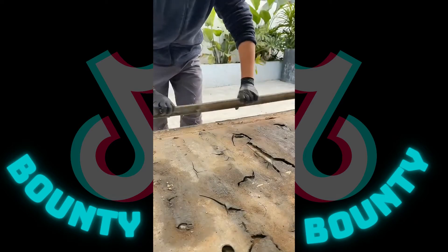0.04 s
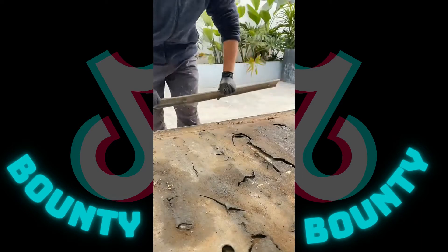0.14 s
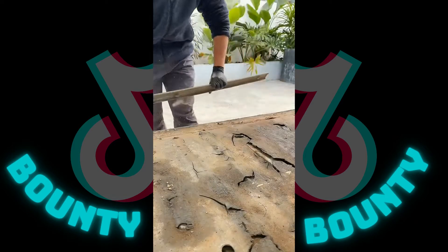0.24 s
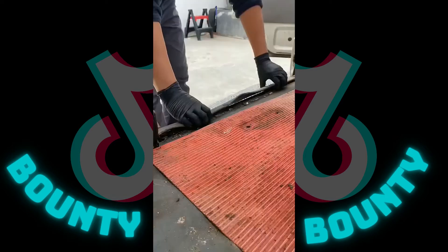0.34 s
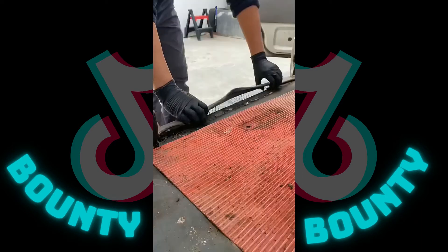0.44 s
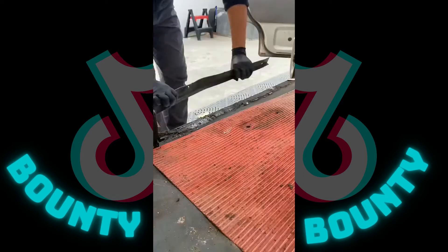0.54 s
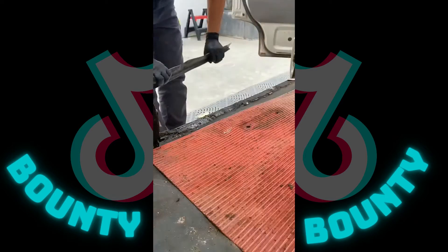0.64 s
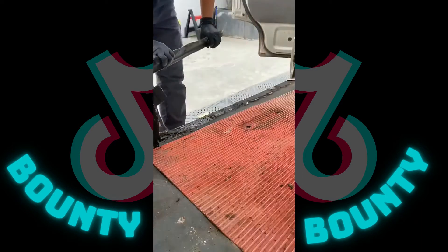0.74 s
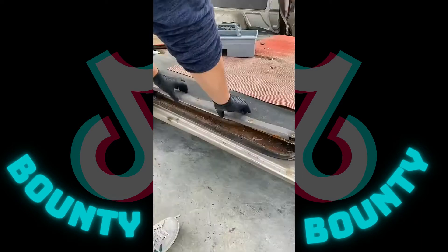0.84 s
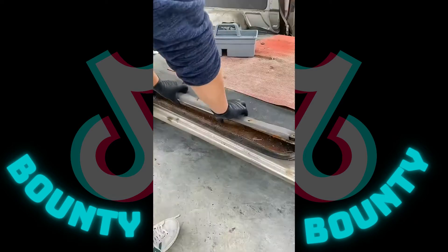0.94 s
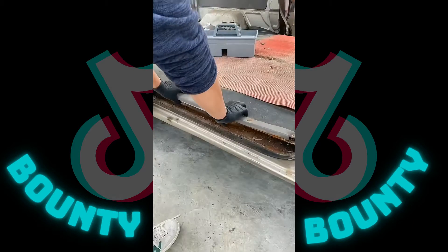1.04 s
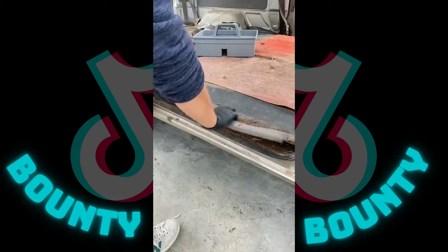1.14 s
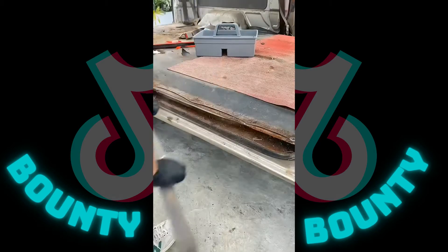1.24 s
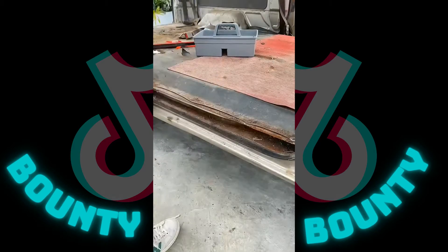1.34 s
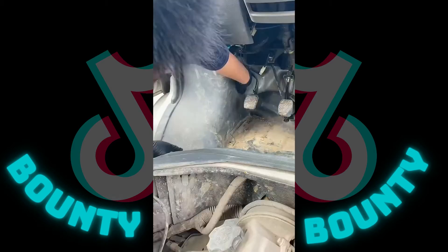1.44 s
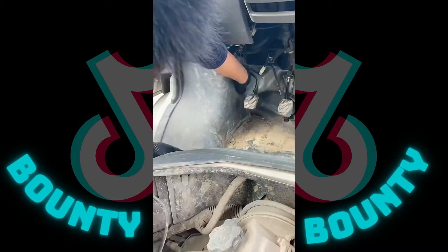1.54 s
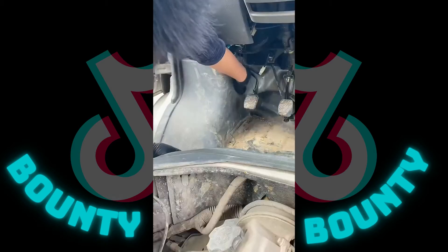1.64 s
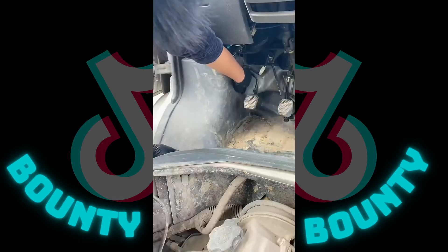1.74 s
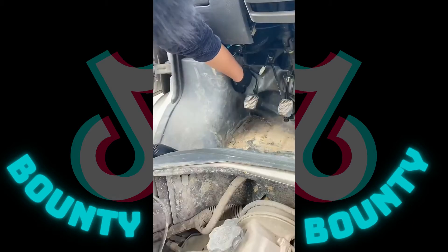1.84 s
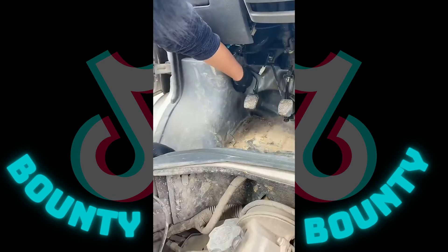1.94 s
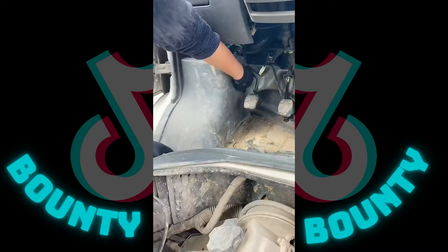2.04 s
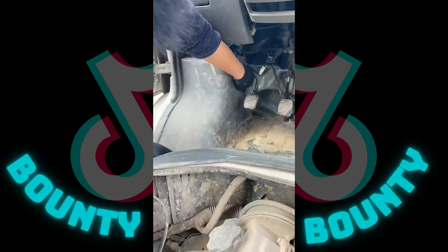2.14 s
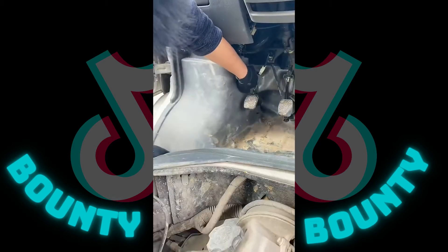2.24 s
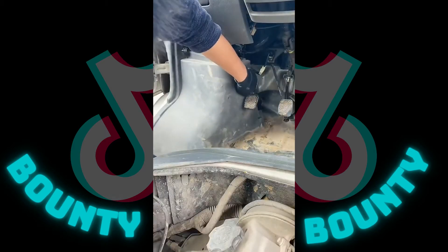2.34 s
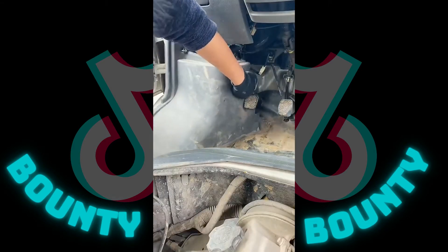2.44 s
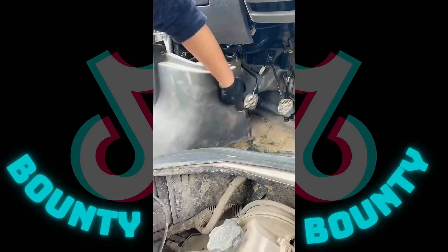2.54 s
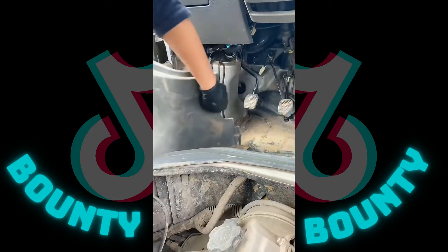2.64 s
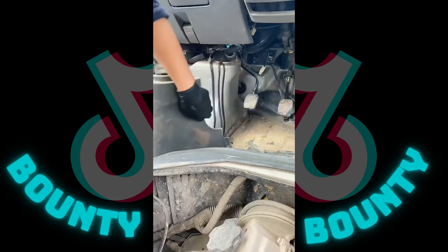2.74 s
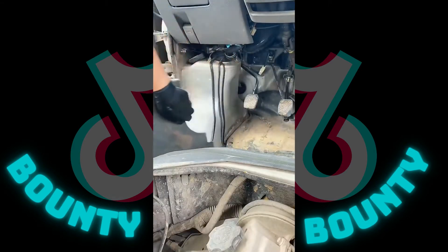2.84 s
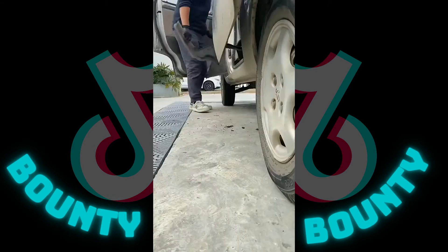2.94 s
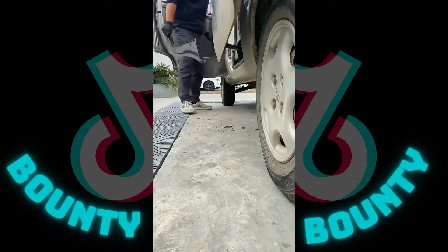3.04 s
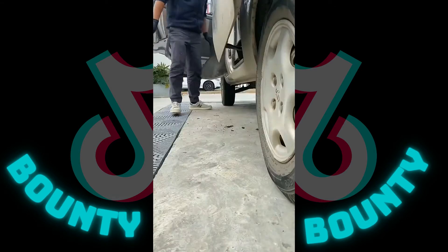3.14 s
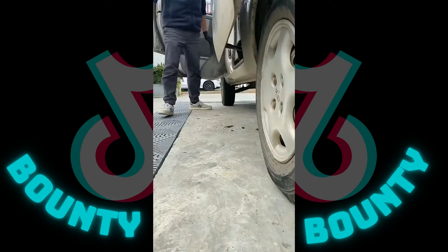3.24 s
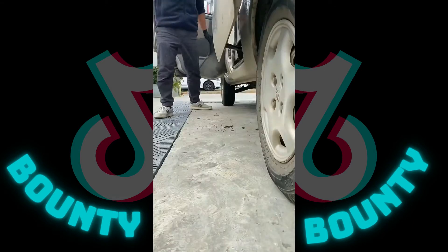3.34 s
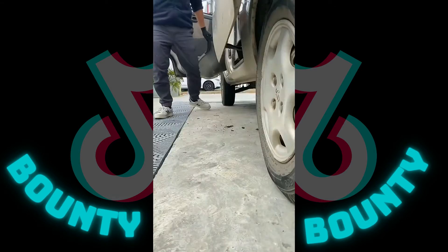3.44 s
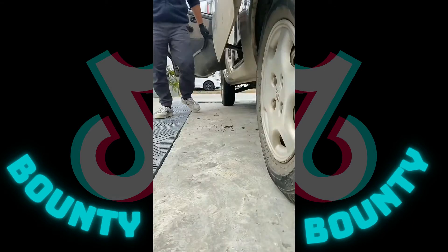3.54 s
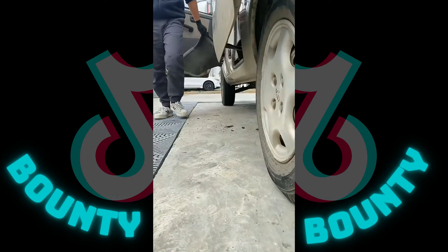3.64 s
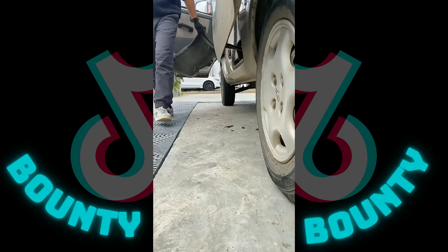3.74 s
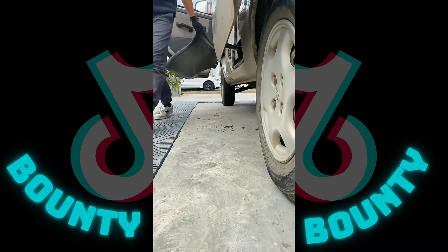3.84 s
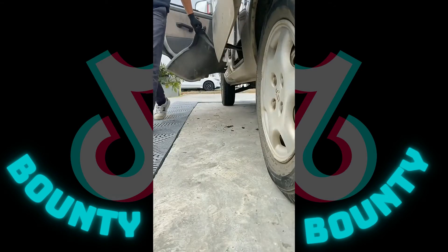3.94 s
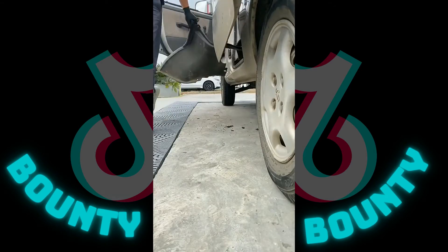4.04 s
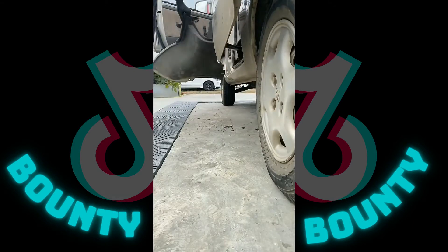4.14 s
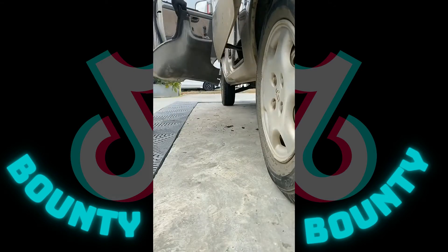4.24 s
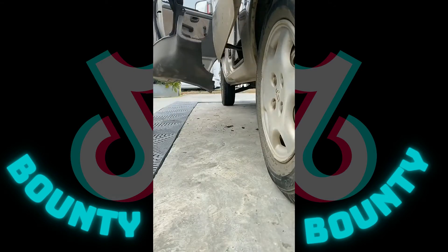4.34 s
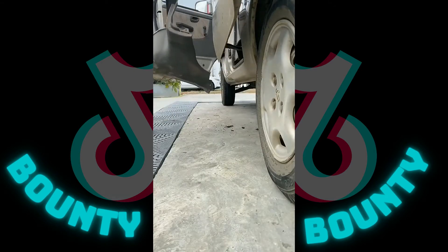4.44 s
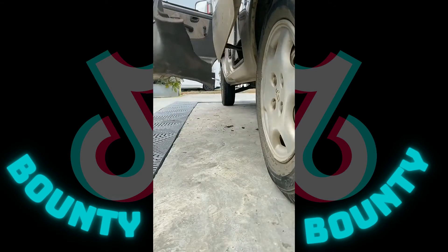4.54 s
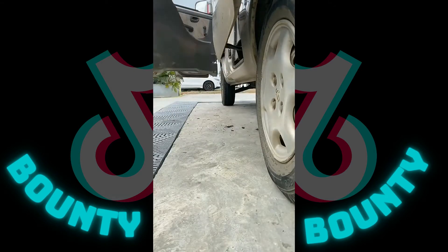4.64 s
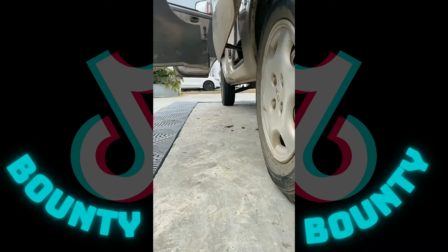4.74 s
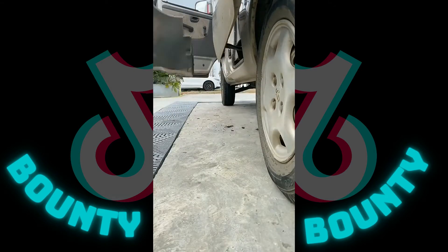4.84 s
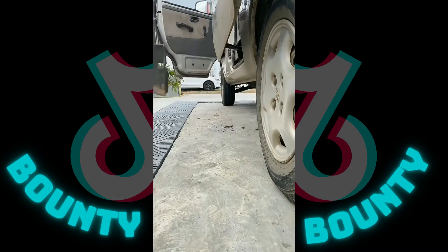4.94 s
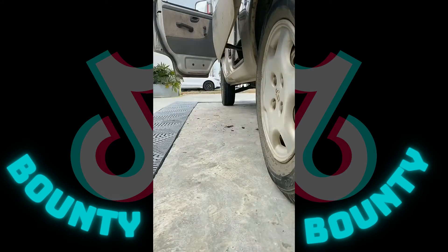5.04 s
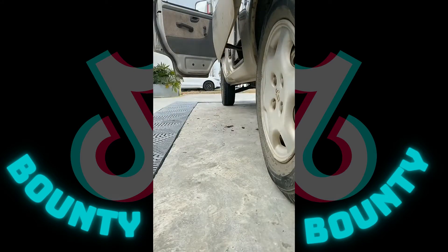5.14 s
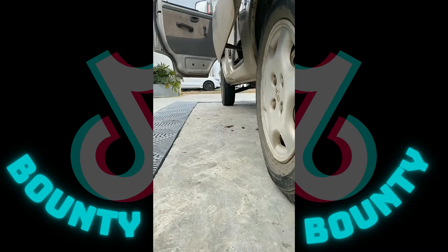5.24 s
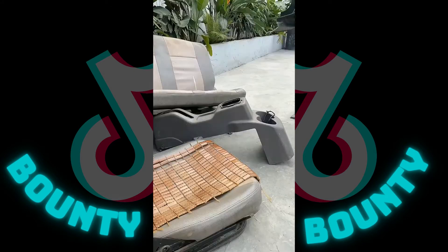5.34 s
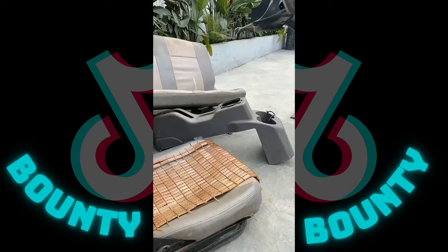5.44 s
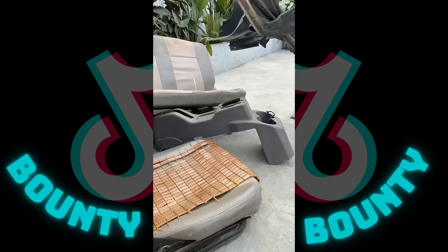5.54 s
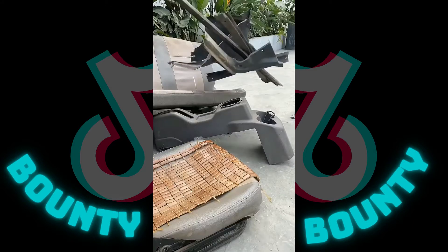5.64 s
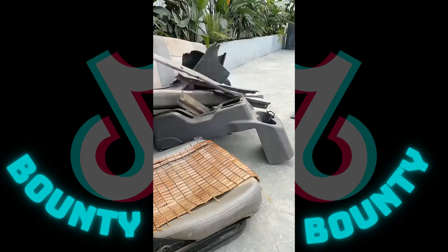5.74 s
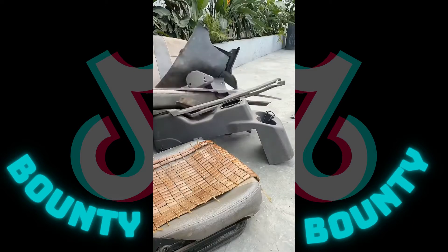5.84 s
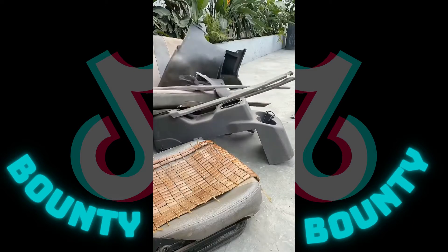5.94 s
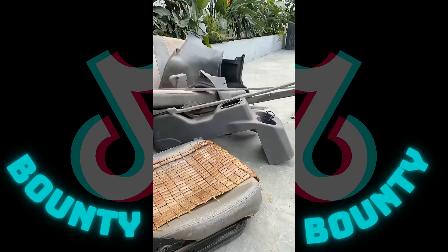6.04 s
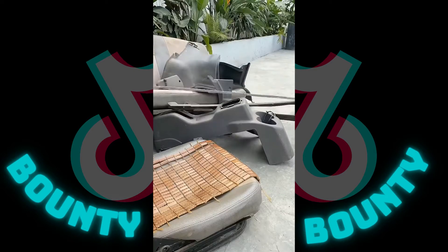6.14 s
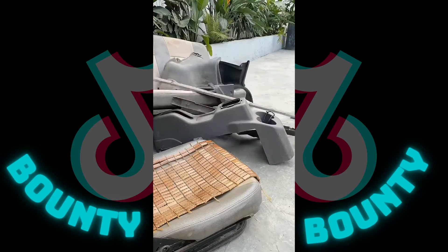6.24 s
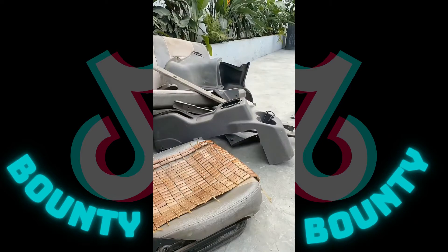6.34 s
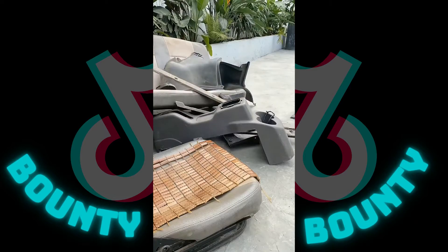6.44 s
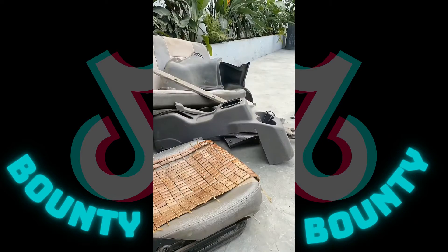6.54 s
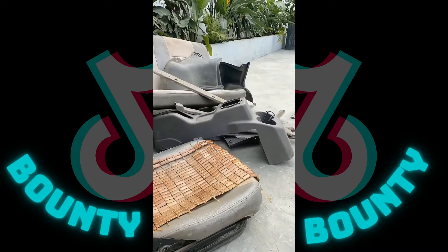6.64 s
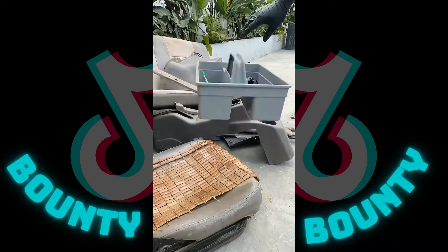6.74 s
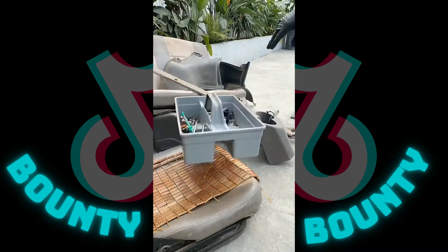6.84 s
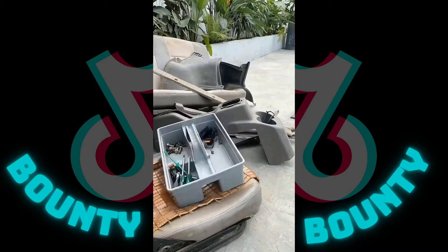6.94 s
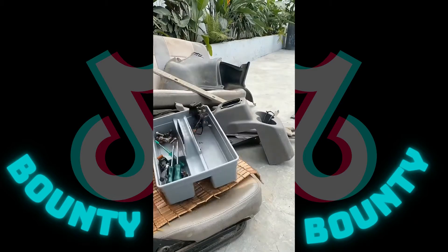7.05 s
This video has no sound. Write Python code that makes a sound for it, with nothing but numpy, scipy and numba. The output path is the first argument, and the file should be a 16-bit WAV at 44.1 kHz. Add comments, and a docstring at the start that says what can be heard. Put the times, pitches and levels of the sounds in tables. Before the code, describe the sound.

A vehicle interior comes apart in short, hard-cut bursts. First come sharp plastic knocks and gritty prying, then a soft handling lull that builds into rough rubber dragging and thumps. Steps and faint heel tocks sound further off on concrete. Finally brittle plastic pieces crash and tumble close by, followed by a tray of tools clacking down. Outdoors, dry, phone microphone, steady low yard rumble.

```python
"""Blows and scraping as a van is stripped, in quick shots heard by a phone: trim strips prised off a sill,
a rubber mat dragged out of the footwell, footsteps on concrete, plastic parts and a tool tray dropped on a pile.
Damped partials, rattle and stick-slip grit ring the object of each shot, and each cut chops the blows.
Swelling notes, dry snaps, mat rasps and heel tocks join them over the steady rumble and hiss of the yard."""
import sys
import numpy as np
from scipy import signal
from scipy.fft import rfft, irfft, next_fast_len
from scipy.io import wavfile
from numba import njit

SR = 44100
rng = np.random.default_rng(int(sys.argv[2]) if len(sys.argv) > 2 else 0)


def unload_audio(sound):
    """Save the sound as a 16-bit wav file, at the path given as the first command line argument."""
    columns = np.transpose(np.atleast_2d(sound))
    # keep every value between -1 and 1, then stretch to whole-number steps
    steps = np.round(np.clip(columns, -1, 1) * 32767)
    wavfile.write(sys.argv[1], SR, steps.astype(np.int16))


N = 313551

# Thud, body, clack, edge and air. Each row: low edge in Hz, high edge in Hz, decay as a factor, share of side
# sound, rattle in dB against the ring, slips a second, cycles that a slip rings, scatter of slips in dB,
# smooth hiss in dB under the slips.
BANDS = [(54, 210, 4.73, .012, -3, 27, 9.8, 1.5, -2), (250, 1073, 1.61, 0.54, -2, 220, 26, 4.5, -1.5),
         (1200, 4000, 0.97, 0.5, -5, 600, 19.3, 1.5, -1.5), (4250, 7790, 0.66, 0.5, 4, 750, 69, 2, -2.5),
         (11990, 14000, 0.46, 0.34, 1, 1200, 110, 9.5, 0)]
# Resonances of what is handled. Each row: pitch in Hz, width in Hz, level in dB before the shared ring level.
TRIM = [(400, 74, -5), (1070, 14, -13.5), (2180, 300, -8.5), (2970, 1000, -6)]
MAT = [(185.6, 53, -7.5), (498, 13, 0.5), (2010, 140, -3), (2520, 830, -8.5), (6080, 1200, 1)]
GROUND = [(75, 18, -0.5), (135, 42, -6.5), (294, 31, 0.5), (385, 35, -1), (452, 390, -1), (522, 11, -7),
          (2620, 370, -6.5)]
PILE = [(410, 87, -18), (754, 85, -9), (880, 73, -8), (2870, 810, -13), (5500, 1200, -10)]
# The shots. Each row: start in seconds, resonances of the object that rings.
SHOTS = [(0, TRIM), (0.248, TRIM), (0.85, TRIM), (1.387, MAT), (2.836, GROUND), (5.62, PILE), (5.885, PILE),
         (6.688, PILE)]
# Air band of each shot, one value a shot: level in dB against the usual.
SHOT_AIR_DB = [1.5, 3, 1, 5, -3, 0.5, 0.5, 2]

CUTS = np.array([s for s, _ in SHOTS] + [N / SR])  # shot starts and the end, in seconds
PAIR = np.array([[1], [-1]])  # left and right
STEP = 8  # levels are worked out every eighth sample
WIDE_HZ = 550.  # below this the sound narrows to the middle
HEEL_PAN_DB = 6.5  # left minus right


def undb(db):
    """Gain of a level in dB."""
    return 10 ** (np.asarray(db) / 20)


def band(x, lo_hz, hi_hz, order=3):
    """Band-pass of white noise, scaled to rms near 1."""
    sos = signal.butter(order, [lo_hz, hi_hz], "bandpass", fs=SR, output="sos")
    return signal.sosfilt(sos, x) / np.sqrt((hi_hz - lo_hz) / (SR / 2))


def spread(mid, side, share):
    """Left and right from a shared and an opposed part."""
    return mid + np.clip(share, 0, 1) * side * PAIR


def side_lean(hz, place, width):
    """Left and right gains of partials at random places, narrowing towards the bass."""
    return 1 + width * np.minimum(hz / WIDE_HZ, 1) * (place - .5) * PAIR


@njit
def add(out, start, stop, first, a, b, left, right):
    """Two-pole resonators that ring freely, each between its own two samples."""
    for k in range(len(a)):
        old, y = 0., first[k]
        for i in range(start[k], stop[k]):
            out[0, i] += left[k] * y
            out[1, i] += right[k] * y
            old, y = y, a[k] * y - b[k] * old


def add_rings(out, s, end_s, hz, t60, gain):
    """Damped sines from times, pitches and decays; each stops about 40 dB down or at end_s."""
    start = (s * SR).astype(int)
    stop = np.minimum(start + (.65 * t60 * SR).astype(int), int(end_s * SR))
    turn = 2 * np.pi * hz / SR
    fall = 1e-3 ** (1 / (t60 * SR))
    add(out, start, stop, np.sin(turn), 2 * fall * np.cos(turn), fall ** 2, gain[0], gain[1])


def yard():
    """Steady rumble and hiss of the open yard, from shaped noise whose bass is alike left and right."""
    # Spectrum of the yard. Each row: frequency in Hz, relative density in dB per Hz.
    yard_shape = np.array([(15, -41), (25, -2.5), (55, 10), (111, -8.5), (439, -30.5), (818, -17.5),
                           (1100, -34.5), (6210, -33), (9070, -91), (13600, -39), (16000, -66)])
    size = next_fast_len(N)
    hz = np.maximum(np.arange(size // 2 + 1) * SR / size, 1)
    shape = undb(np.interp(np.log(hz), np.log(yard_shape[:, 0]), yard_shape[:, 1]))
    mid, side = rfft(rng.standard_normal((2, size))) * shape
    out = irfft(spread(mid, side, hz / 9000.), size)[:, :N]
    return out * undb(-59) / np.sqrt(np.mean(out ** 2))


def rubbing():
    """Gain of rumble, scraping and slides in each band; brightness tips the bands round the clack."""
    # Low rumble of handling and steps. Each row: time in seconds, relative level in dB.
    rumble = [(0.0, -43), (0.24, -47), (0.53, -53), (0.95, -47.5), (1.21, -42.5), (1.52, -48), (2.14, -46),
              (2.26, -38), (2.49, -42), (2.79, -58.5), (3.8, -52), (4.16, -57), (4.53, -56.5), (5.48, -56),
              (6.22, -37), (6.38, -57), (6.61, -46), (7.11, -66)]
    # Scraping and rattling between knocks, one curve a stretch of work. Each row: time in seconds,
    # relative level in dB, brightness in dB a band.
    scrape = [
        [(0.0, -52.5, 12), (0.412, -65.5, -17), (0.564, -35, -2), (0.644, -55, -13), (0.834, -40.5, -3),
         (1.062, -57.5, -3), (1.21, -52.5, 13), (1.344, -37, -1), (1.388, -55, 3)],
        [(1.388, -53.5, 2.5), (1.57, -44.5, -1), (2.106, -48, -4), (2.236, -26.5, -8), (2.306, -36, -7.5),
         (2.544, -28.5, -2.5), (2.662, -29, -4), (2.75, -62, -8), (2.84, -56.5, -11)],
        [(2.84, -75.5, -5), (2.96, -62, -6.5), (3.01, -51.5, 7), (3.154, -57, -1), (3.45, -63, 3),
         (3.566, -62.5, 3), (3.948, -48, 1), (4.154, -67, 1), (4.2, -51, 3)],
        [(4.2, -64, 2), (4.558, -64.5, -5), (4.816, -66.5, -4.5), (5.014, -65, -10.5), (5.278, -58, 4),
         (5.62, -61.5, 2.5)],
        [(5.62, -55, -3), (5.69, -27, 5), (5.81, -25.5, -1), (5.836, -37, 2.5), (6.018, -43.5, -6),
         (6.172, -24.5, 2), (6.244, -31, -1.5), (6.52, -38, -0.5), (6.622, -42, -5), (6.689, -54, 2)],
        [(6.689, -55.5, -7.5), (6.885, -59, -24), (7.035, -39.5, -4), (7.11, -16.5, -9.5)],
    ]
    # Single slides and scuffs. Each row: start in seconds, moment the swell aims for in seconds, latest end
    # in seconds (a cut may come sooner), relative level in dB, brightness in dB a band.
    slides = [(0.31, 0.389, 0.44, -38.5, -1), (0.554, 0.565, 0.65, -23, 1.5),
              (0.98, 1.077, 1.235, -22, -2.5), (1.21, 1.263, 1.3, -27.5, -3),
              (1.91, 1.987, 2.02, -52.5, 15.5), (2.036, 2.054, 5.6, -30, -2), (2.07, 2.167, 2.3, -26, -0.5),
              (4.286, 4.423, 4.84, -48.5, 4.5), (4.853, 4.934, 5, -45, 18.5), (4.94, 4.986, 5.7, -62, 2),
              (6.242, 6.335, 6.27, -29, 18), (6.81, 6.847, 7.4, -42, 10), (7.054, 7.061, 7.9, -24, 6)]
    # Body, clack, edge and air at brightness 0, each in dB against the level of the scrape.
    colour = np.array([-7.5, -8.5, -18, -30])[:, None]
    # How far brightness moves body, clack, edge and air, each as a factor.
    tip = np.array([-0.75, 0.26, 1.09, 1.61])[:, None]
    swell_db = 34  # how far below its aim a slide starts, and the fall it heads for afterwards

    t = np.arange(N // STEP + 1) * STEP / SR
    db = np.zeros((len(BANDS), len(t)))
    db[0] = np.interp(t, *np.transpose(rumble))
    for curve in scrape:
        s, level, bright = np.transpose(curve)
        now = t >= s[0]
        db[1:, now] = np.interp(t[now], s, level) + colour + tip * np.interp(t[now], s, bright)
    power = undb(db) ** 2
    for start, aim, end, level, bright in slides:
        next_cut = CUTS[CUTS > aim][0]
        now = (t > start) & (t < min(end, next_cut))
        swell = np.interp(t[now], [start, aim, end], [-swell_db, 0, -swell_db])
        power[1:, now] += undb(level + swell + colour + tip * bright) ** 2
    shot = np.searchsorted(CUTS[1:-1], t)
    power[-1] *= undb(np.array(SHOT_AIR_DB)[shot]) ** 2
    return np.sqrt(power)


def slips(k, noise):
    """Dense small stick-slips in band k, each ringing briefly at its own pitch, over a smooth hiss."""
    lo, hi, _, share, _, rate, cycles, scatter_db, hiss_db = BANDS[k]
    when, u, size, place, pick = rng.random((8000, 5))[:int(rate * N / SR)].T

    # in body and clack, half of the slips follow a wandering pitch with 14 new goals a second
    goals = rng.random(int(14 * N / SR))
    favoured = np.interp(when, np.linspace(0, 1, len(goals)), goals) + .15 * (u - .5)
    follows = pick < .5 * (k in (1, 2))
    u = np.where(follows, np.clip(favoured, 0, 1), u)
    hz = lo * (hi / lo) ** u

    gain = undb(scatter_db * np.minimum(-np.log(1 - size), 3.2)) * side_lean(hz, place, share * 3.5)
    out = np.zeros((2, N))
    add_rings(out, when * N / SR, N / SR, hz, cycles / hz, gain)
    side_lo = max(lo, min(WIDE_HZ, hi / 2))
    hiss = spread(band(noise[0], lo, hi), band(noise[1], side_lo, hi), share)
    return out / np.sqrt(np.mean(out ** 2)) + undb(hiss_db) * hiss


def notes():
    """Clear notes, low and middle hums and one thin high tone: wavering sines that swell, then fade or are cut."""
    # Each row: start in seconds, pitch in Hz, level in dB before swell and decay, rise in ms, decay in seconds.
    note_rows = [(0.0, 153.5, -24.5, 0.69, 0.28), (0.015, 70.1, -23.5, 5.7, 0.49),
                 (0.401, 379, -25.5, 5.6, 0.14), (0.419, 64.6, -17.5, 17, 0.2),
                 (0.564, 374, -37, 5.4, 0.061), (0.575, 790, -28, 6.7, 0.23), (1.02, 410, -26, 28, 0.57),
                 (1.082, 337, -1.5, 3.8, 0.054), (1.1, 536, -17.5, 6.2, 0.13), (1.13, 333, -27.5, 7, 0.32),
                 (1.11, 168.6, -24.5, 19, 0.35), (1.245, 410, -21.5, 11, 0.24),
                 (1.249, 1180, -21, 7.4, 0.17), (2.063, 197, -21, 8.1, 0.13), (2.12, 505, -13.5, 8.2, 0.16),
                 (2.155, 230, -20.5, 6.7, 0.14), (2.225, 506, -14, 9.6, 0.13),
                 (2.554, 422, -16.5, 4.8, 0.096), (2.989, 74.8, -24, 25, 0.42), (3.095, 525, -35, 5, 0.21),
                 (3.34, 384, -39, 12, 0.17), (3.485, 70, -22.5, 7.1, 0.34),
                 (3.487, 131.5, -18.5, 9.9, 0.16), (3.488, 396, -20, 3.1, 0.15),
                 (3.495, 538, -20, 2.1, 0.16), (3.749, 61.7, -24.5, 14, 0.2), (3.875, 98, -20.5, 9.2, 0.18),
                 (3.885, 263.8, -20, 12, 0.25), (3.895, 76.3, -24, 19, 0.3), (3.899, 180, -25, 4.2, 0.22),
                 (5.077, 888, -50, 1, 0.034), (5.665, 882, -14.5, 3, 0.083), (6.283, 880, -38, 4.1, 0.043),
                 (6.314, 970, -7.5, 0.91, 0.043), (6.856, 719, -5, 1.8, 0.042),
                 (6.885, 439, -14.5, 4.9, 0.079), (6.978, 11200, -20.5, 6.8, 0.083),
                 (7.068, 753, -12, 4.2, 0.13)]
    wobble = 0.0091  # share by which the pitch strays, less above 1 kHz
    out = np.zeros(N)
    for (s, hz, db, rise_ms, t60), u in zip(note_rows, rng.random(len(note_rows))):
        a = int(max(s, 0) * SR)
        next_cut = CUTS[CUTS > s + 1e-4][0]
        t = np.arange(int(min(next_cut - s, t60) * SR) - 1) / SR
        phase = 2 * np.pi * (hz * t + wobble * min(hz, 1000) / 30 * np.sin(30 * t + 6 * u))
        swell = (1 - np.exp(-t * 1000 / max(rise_ms, .3))) ** 2
        out[a:a + len(t)] += undb(db) * swell * 0.00067 ** (t / t60) * np.sin(phase)
    return out


def partial_pitches(k, shot, u, body_hz, clack_hz):
    """Pitches of a blow's partials in band k: low modes, a cluster round one pitch, or a free scatter."""
    # Low modes of the van body, the base of every thud: pitches in Hz before the shot's factor.
    boom_hz = [70.5, 149, 223.5]
    # Thud pitch of each shot as a factor; loose parts on the pile thud higher than the van.
    boom_pitch = [1.1, 0.92, 1.1, 1, 1, 1.7, 1.5, 1.2]
    lo, hi = BANDS[k][:2]
    hz = lo * (hi / lo) ** u
    if k == 0:
        hz = np.array(boom_hz) * boom_pitch[shot] * (1 + .12 * (u - .5))
    if k == 1:  # a hollow part gathers its partials round one pitch
        hz = body_hz * 2 ** (1.5 * (u - .5) * np.linspace(.1, 1, len(u)))
    if k == 2:
        hz[::2] = clack_hz * 2 ** (.5 * (u[::2] - .5))
    return hz


def add_chatter(out, s, cut, centre_hz, t60, gain, share, chance):
    """A struck part chatters on near its pitch in short ticks, thinning and fading with its decay."""
    late, u, size, place = chance
    after = .6 * t60 * late ** 1.5
    hz = centre_hz * 2 ** (0.98 * (u - .5))
    fade = undb(-3 - 60 * after / (1.69 * t60))
    each = gain * fade * size * (1 + share * (place - .5) * PAIR)
    add_rings(out, np.minimum(s + after, cut), cut, hz, 20.7 / hz, each)  # a tick rings 20.7 cycles


def knocks(k, count):
    """Band k of all blows: struck partials, and the power over time of the rattle and crack."""
    # Blows on the handled parts. Each row: start in seconds, relative clack level in dB, then thud, body and
    # edge in dB above it, body pitch in Hz, clack pitch in Hz, decay in seconds before the factors of band and shot.
    knock_rows = [(0.0014, -43, 11.5, 6, -13, 250, 1200, 0.12), (0.0442, -36, 4, -27, -7, 380, 3330, 0.069),
                  (0.0646, -34.5, -19, -33, -3, 258, 3310, 0.12),
                  (0.397, -16.5, -6, -9.5, -4.5, 394, 1360, 0.083),
                  (0.4105, -14, -9.5, -6.5, -7.5, 752, 2010, 0.081),
                  (0.4516, -24.5, -1, 1.5, -14, 298, 3250, 0.08), (0.472, -27, 6, 1, -14, 294, 1400, 0.092),
                  (0.5012, -23.5, -13, -9, -21, 294, 1683, 0.22),
                  (0.561, -17.5, -25, -27, -15, 890, 2880, 0.06),
                  (0.5695, -13, -15.5, -9.5, -23, 362, 1470, 0.13),
                  (0.7295, -34.5, -5, -5, -44, 757, 2540, 0.16),
                  (0.7705, -45.5, -10, 13.5, -30, 558, 1200, 0.12),
                  (0.8334, -38, -26, 11.5, -14, 612, 1320, 0.22),
                  (1.0021, -46, 4, 8.5, -2, 461, 2940, 0.81),
                  (1.0863, -9.5, -19.5, 1, -10.5, 790, 1305, 0.11),
                  (1.112, -13.5, -36, -2, -9.5, 840, 1290, 0.061),
                  (1.2406, -18.5, -10, -2, -19.5, 1183, 1560, 0.22),
                  (1.286, -10, -29, -17.5, -8.5, 392, 3320, 0.053),
                  (1.5733, -39.5, -8, -5, -18, 453, 1420, 0.061),
                  (1.6783, -36, -1, 3.5, -10.5, 654, 3220, 0.086),
                  (1.8113, -46.5, 10, 15, -27, 703, 1440, 0.077),
                  (1.8496, -24, -10.5, 1.5, -26, 724, 1300, 0.11),
                  (2.0558, -15.5, -14, -3, -22, 594, 1600, 0.12),
                  (2.1264, -29, -9, 7, -16, 536, 1170, 0.35),
                  (2.2968, -35.5, -5.5, -10, 12.5, 522, 2160, 0.05),
                  (2.3272, -18, -25.5, -6.5, -15, 470, 1840, 0.17),
                  (2.3796, -15.5, -16, -1, -26, 689, 2270, 0.15),
                  (2.392, -18.5, -20, -4.5, -20.5, 521, 1883, 0.28),
                  (2.5536, -33.5, 0, 0, -13, 437, 2010, 0.096),
                  (2.6435, -19, -19, -7, -24.5, 1070, 1455, 0.17),
                  (2.681, -26, -23, -9.5, -17.5, 900, 2570, 0.1),
                  (2.9686, -28.5, -3, -2.5, -19.5, 464, 1425, 0.21),
                  (3.0981, -38.5, 4, -1, -17, 531, 1260, 0.12),
                  (3.2304, -33, -27, -11.5, -9, 250, 2010, 0.13),
                  (3.323, -51, -7, -2.5, -10, 250, 2750, 0.24),
                  (3.483, -17.5, -17.5, -6, -20.5, 904, 2944, 0.13),
                  (3.823, -35.5, -11, -2, -9, 362, 1410, 0.04),
                  (3.8464, -36.5, -15, -3, -6, 264, 2700, 0.082), (3.873, -31, 0, 2, -13, 526, 1310, 0.15),
                  (5.3111, -33, -25, -15, -18.5, 566, 1350, 0.13),
                  (5.3577, -35, -31, -10, -17, 508, 2486, 0.18),
                  (5.5182, -38.5, -12, -8, -15, 656, 1410, 0.074),
                  (5.638, -17, -23, -2, -17, 901, 1410, 0.15),
                  (5.654, -5.5, -18, -15, -17, 392, 2685, 0.13),
                  (5.6659, -10, -14.5, -5, -18, 860, 2960, 0.1),
                  (5.6965, -10, -12, -11.5, -19.5, 802, 2870, 0.14),
                  (5.719, -14, -19, -3.5, -24, 656, 2890, 0.065),
                  (5.7413, -17, -35, -2.5, -6.5, 536, 1220, 0.13),
                  (5.7625, -13, -28, -11, -19.5, 792, 1320, 0.14),
                  (5.8702, -21.5, -31, -8.5, -19, 452, 2620, 0.083),
                  (5.915, -25.5, -20, -3, -20, 497, 2650, 0.61),
                  (5.9925, -16.5, 2, -2.5, -15.5, 250, 3000, 0.047),
                  (6.0546, -22.5, -21, -16, -7, 680, 2180, 0.052),
                  (6.0789, -19, -28, -7.5, -5, 344, 2400, 0.062),
                  (6.1005, -18.5, -22, -6, -29, 900, 1580, 0.05),
                  (6.1198, -6.5, -20.5, -11.5, -35, 400, 2870, 0.1),
                  (6.155, -8.5, -16, -14, -7.5, 1160, 1660, 0.044),
                  (6.1759, -16, -16, -14, -22, 1007, 2750, 0.15),
                  (6.186, -22.5, -3, 4.5, -20, 592, 1390, 0.055),
                  (6.2417, -18.5, -11, -18, -38, 398, 1720, 0.19),
                  (6.267, -17, -27, -22, -33, 880, 2270, 0.091),
                  (6.2825, -11, -17, -8, -24, 982, 2100, 0.18),
                  (6.3155, -13.5, -12.5, -9.5, -18, 955, 2050, 0.2),
                  (6.338, -14.5, -34, -11, -12.5, 890, 3100, 0.055),
                  (6.3684, -18.5, -40, -21, -22, 880, 3646, 0.21),
                  (6.4172, -22.5, -41, -28, -14, 1260, 1960, 0.13),
                  (6.4702, -25.5, -25, -11, -14.5, 970, 1446, 0.17),
                  (6.513, -32.5, -5, 1.5, -33, 398, 1390, 0.12),
                  (6.552, -33.5, -12.5, 0, -15, 400, 1980, 0.064),
                  (6.5802, -28.5, -10, -16, -20, 384, 1740, 0.073),
                  (6.6243, -19, -25, -8, -15, 982, 1610, 0.11),
                  (6.7333, -41, -3, 4.5, -32, 273, 1390, 0.058),
                  (6.8009, -43.5, -11, 7, -33, 452, 1400, 0.08),
                  (6.8465, -23.5, -26, -12, -7, 730, 3370, 0.088),
                  (6.8543, -6.5, -13, -7, -9.5, 737, 1213, 0.12),
                  (6.8808, -6, -25, -3, -20, 384, 1260, 0.063),
                  (6.893, -18, -20, 2.5, -14, 500, 1900, 0.06),
                  (6.915, -28.5, -18, -2, -23, 960, 1280, 0.17),
                  (6.9804, -30, -22, -7, -9.5, 630, 1920, 0.082),
                  (7.0281, -29, -14, -7, -15, 920, 1940, 0.16),
                  (7.049, -25.5, -18, -1, -29, 835, 1400, 0.065),
                  (7.0651, -11, -32, -2.5, -16, 722, 1408, 0.26),
                  (7.0873, -11, -36, -7, -13, 720, 1200, 0.44)]
    # Heel taps on concrete. Each row: start in seconds, relative clack level in dB, then thud, body and
    # edge in dB above it, body pitch in Hz, clack pitch in Hz, decay in seconds before the same factors.
    heel_rows = [(4.36, -53, 7.5, 10.7, -1.5, 582, 1750, 0.05),
                 (4.867, -55, 6.7, 11.3, -2, 496, 3260, 0.06), (5.077, -62, 14, 13.6, -5, 925, 1200, 0.02)]
    # How long the thuds of each shot boom, as a factor.
    shot_boom = [1.2, 0.93, 0.8, 0.97, 0.91, 0.61, 0.55, 0.48]
    # Where each shot's work sits: left minus right in dB, added to the pan of the contact.
    shot_pan = [0.3, 0.9, -0.4, -0.7, 0.1, -0.44, 0.44, 0.4]

    _, _, stretch, share, rattle_db = BANDS[k][:5]
    struck, power = np.zeros((2, N)), np.zeros((2, N // STEP + 1))
    # append how fast the contact builds up (ms) and its pan (dB)
    blows = [(*row, 3.9, -0.4) for row in knock_rows]
    blows += [(*row, 0.86, HEEL_PAN_DB) for row in heel_rows]
    chance = rng.random((len(blows), 6, count))
    ticks = rng.random((len(blows), 4, 30))  # 30 ticks of chatter a blow
    for row, tick, (u, size, life, place, late, sign) in zip(blows, ticks, chance):
        s, db, thud, body, edge, body_hz, clack_hz, t60, rise_ms, pan = row
        shot = np.sum(CUTS[1:] <= s)
        cut = CUTS[CUTS > s][0]
        rise = max(rise_ms, .2) / 1000
        if k == 0:
            t60 = t60 * shot_boom[shot]
        t60 = max(t60 * stretch, .008)
        air = edge - 8.5 + SHOT_AIR_DB[shot]
        band_db = (thud, body, 0, edge, air)[k]
        pan_db = PAIR * (pan + shot_pan[shot]) / 2 * (k > 0)  # thuds stay in the middle
        gain = undb(db - 5.0 + band_db + pan_db)

        hz = partial_pitches(k, shot, u, body_hz, clack_hz)
        each = gain * (0.38 + size) * np.sign(sign - .5) * side_lean(hz, place, share * 0.46)
        each = each * 2.0 / np.sqrt(count)
        partial_t60 = t60 * (0.08 + 1.32 * life ** 2)
        if k > 1:  # small stiff parts ring shorter than their rattle lasts
            partial_t60 = partial_t60 * 0.58
        # a soft or glancing contact sets the partials off one after another
        add_rings(struck, s + rise * late, cut, hz, partial_t60, each * (1.6 - life))
        if k in (1, 2):
            add_chatter(struck, s + rise, cut, (body_hz, clack_hz)[k - 1], t60, gain, share, tick)

        a = int(s * SR / STEP)
        t = np.arange(int(min(cut - s, 1.4 * t60) * SR / STEP)) * STEP / SR
        rattle = undb(rattle_db) * (1 - np.exp(-t / rise)) * 0.00067 ** (t / (1.63 * t60))
        power[:, a:a + len(t)] += (gain * rattle) ** 2
        if k > 1:  # a dry crack at first touch: the slower the contact, the weaker
            crack = undb(-1.5) * min(0.0024 / rise, 1) * (1 - np.exp(-t / 0.001))
            crack = crack * 0.0019 ** (np.abs(t - rise / 2) / 0.026)
            power[:, a:a + len(t)] += (gain * crack) ** 2
    return struck, power


def contacts():
    """Blows and scraping together: what shakes the object in hand."""
    # Partials that a blow rings in each band, as a count.
    partials = [3, 8, 12, 10, 3]
    out, rub, noise = 0, rubbing(), rng.standard_normal((2, N))
    for k in range(len(BANDS)):
        struck, power = knocks(k, count=partials[k])
        level = np.repeat(np.sqrt(power + rub[k] ** 2), STEP, axis=1)[:, :N]
        out = out + struck + level * slips(k, noise) * undb(-3.5)
    return out


def ring(force):
    """Each shot adds the resonances of its object, as peak filters driven by the contacts."""
    ring_db = 4
    out = force.copy()
    edges = [int(s * SR) for s, _ in SHOTS] + [N]
    for (_, modes), a, b in zip(SHOTS, edges, edges[1:]):
        for hz, width, db in modes:
            peak = signal.iirpeak(hz, hz / max(width, 5), SR)
            out[:, a:b] += undb(ring_db + db) * signal.lfilter(*peak, force[:, a:b])
    return out


def push(s, db, from_hz, to_hz, half_ms):
    """One brief push under a bell-shaped envelope, its pitch sliding."""
    out, half = np.zeros(N), half_ms / 1000
    t = np.arange(-int(2 * half * SR), int(2 * half * SR)) / SR
    phase = 2 * np.pi * np.cumsum(np.interp(t, [-half, half], [from_hz, to_hz])) / SR
    a = int((s + t[0]) * SR)
    out[a:a + len(t)] = undb(db) * np.exp(-2 * (t / half) ** 2) * np.sin(phase)
    return out


def snaps():
    """Stiff plastic snaps dryly, in a few cycles of one pitch."""
    # Each row: middle of the snap in seconds, envelope peak in dB, pitch in Hz.
    snap_rows = [(0.573, -15.5, 1600), (0.7321, -28.5, 1920), (2.33, -10, 1900), (3.8245, -34, 1750),
                 (3.848, -36, 2770), (4.009, -46.5, 1700), (4.056, -45, 2000), (4.084, -46.5, 1900),
                 (5.658, -4.5, 2700), (5.7, -5, 3200), (6.081, -15, 2520), (6.1567, -13.5, 1810),
                 (6.177, -11, 2730), (6.319, -9.5, 1900)]
    half_cycles = 1.393  # half-length of the bell, in cycles
    return sum(push(s, db, hz, hz, half_cycles * 1000 / hz) for s, db, hz in snap_rows)


def rasps():
    """Rough narrow bands whose centre slides as the mat bends and drags."""
    # Each row: start in seconds, loudest moment in seconds, end in seconds, first pitch in Hz, last pitch
    # in Hz, width in Hz, relative level in dB.
    rasp_rows = [(2.121, 2.175, 2.23, 3100, 2180, 500, -33), (2.14, 2.158, 2.2, 1305, 1825, 250, -33),
                 (2.42, 2.48, 2.55, 850, 785, 80, -34.5), (2.4, 2.527, 2.62, 468, 520, 70.6, -36),
                 (2.537, 2.564, 2.6, 940, 803, 120, -31.5), (2.597, 2.638, 2.73, 1685, 1310, 300, -39.5),
                 (2.63, 2.666, 2.74, 526, 400, 91, -36.5)]
    out = np.zeros((2, N))
    for start, top, end, from_hz, to_hz, width_hz, db in rasp_rows:
        a, b = int(start * SR), int(end * SR)
        t = np.arange(a, b) / SR
        lowpass = signal.butter(2, width_hz / 2, fs=SR, output="sos")
        rough = signal.sosfilt(lowpass, rng.standard_normal((4, SR // 2)))[:, :b - a]
        turn = 2 * np.pi * np.cumsum(np.linspace(from_hz, to_hz, b - a)) / SR
        pair = (rough[:2] * np.cos(turn) + rough[2:] * np.sin(turn)) * np.sqrt(SR / width_hz)
        swell_db = np.interp(t, [start, top, end], [-15, 0, -15])
        out[:, a:b] += spread(*pair, 0.18) * undb(db + swell_db)
    return out


def heel_tocks():
    """Hollow heel tocks: brief pushes of falling pitch with a close echo, towards the left."""
    # Each row: middle of the tock in seconds, envelope peak in dB before panning.
    tock_rows = [(4.358, -30), (4.8662, -29), (4.951, -45)]
    echo_ms, echo_db = 5.97, -14
    heel = sum(push(s, db, from_hz=950, to_hz=250, half_ms=2.31) for s, db in tock_rows)
    heel = heel + undb(echo_db) * np.roll(heel, int(echo_ms * SR / 1000))
    return heel * undb(PAIR * HEEL_PAN_DB / 2)


def scene():
    """All shots in a row."""
    handling = ring(contacts()) * undb(-3.5)
    return handling + notes() + snaps() + rasps() + heel_tocks() + yard()


def record(dry):
    """The phone cuts the deepest bass, rounds the loudest peaks and cuts the top."""
    bass_cut = signal.butter(3, 33., "highpass", fs=SR, output="sos")
    top_cut = signal.ellip(8, .2, 70, 16000, fs=SR, output="sos")
    rounded = np.tanh(1.121 * signal.sosfilt(bass_cut, dry)) / 0.83
    return signal.sosfilt(top_cut, rounded)


dry = scene()
out = record(dry)
unload_audio(out)
```